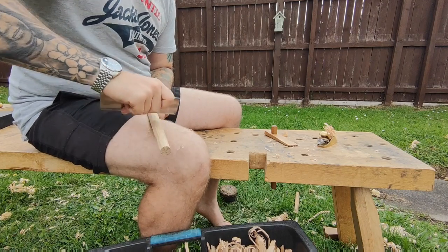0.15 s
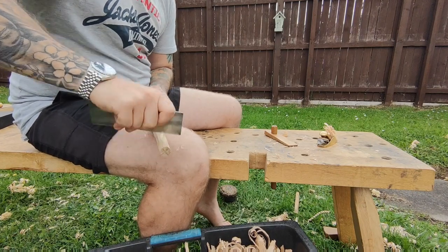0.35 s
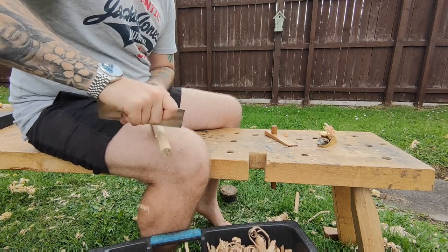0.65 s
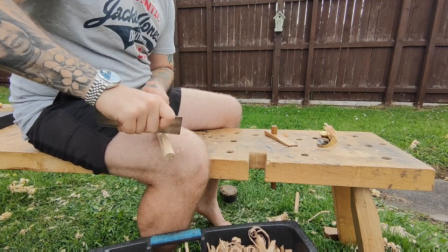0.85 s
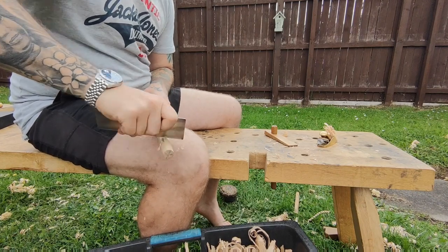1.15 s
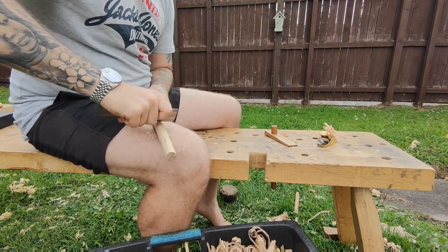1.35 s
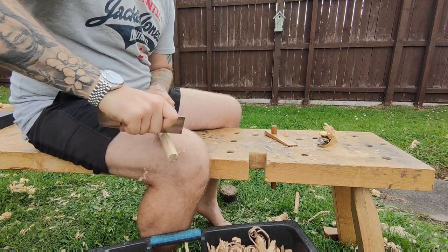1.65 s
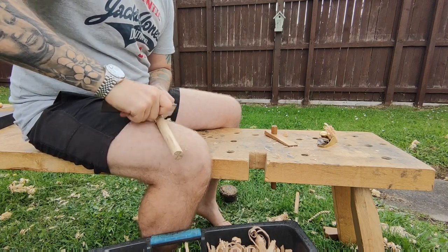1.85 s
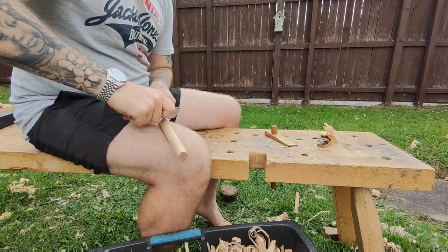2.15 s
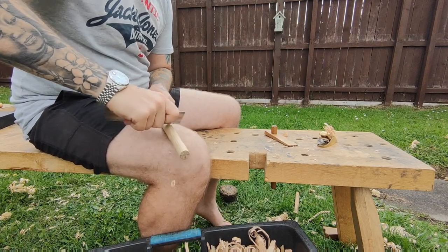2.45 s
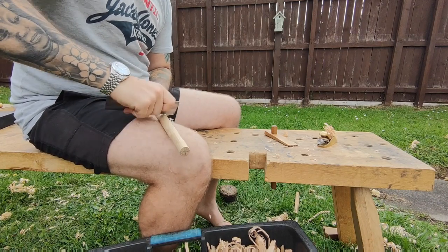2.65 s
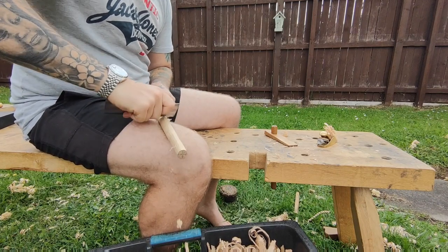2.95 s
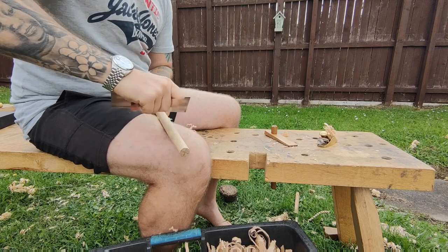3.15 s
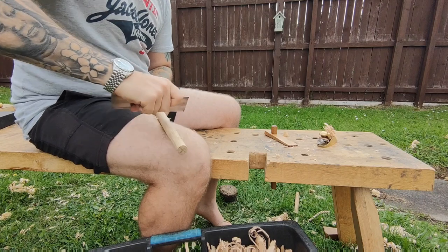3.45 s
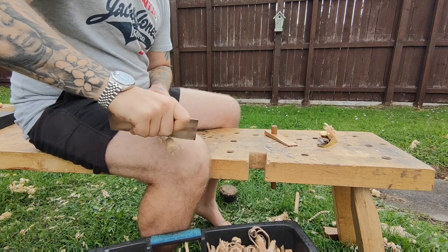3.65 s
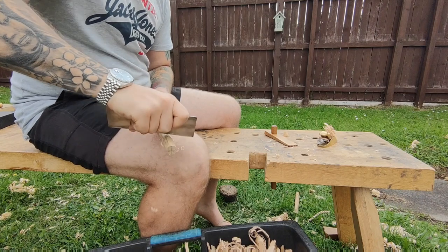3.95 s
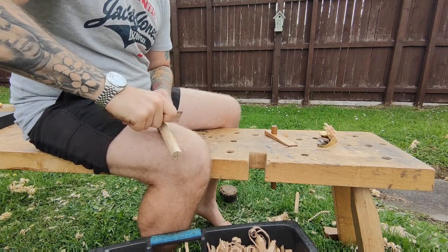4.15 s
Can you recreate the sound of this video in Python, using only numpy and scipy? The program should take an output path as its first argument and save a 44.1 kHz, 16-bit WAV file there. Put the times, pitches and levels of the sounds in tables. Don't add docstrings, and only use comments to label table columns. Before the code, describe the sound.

Regular short scrapes of steel on dry wood, heard close up: tick, then a crackling, slightly metallic shear, then a brief gap, repeated steadily throughout. A few strokes catch and tear harder, notably around 1.4, 2.2 and 3.05 seconds. Knee and bench add a tight reflection, fences a faint short wash. Low breeze and leaves stay quiet behind, with a barely audible insect early on.

```python
import sys
import numpy as np
from scipy import signal
from scipy.fft import rfft, irfft
from scipy.io import wavfile
from scipy.ndimage import uniform_filter1d, map_coordinates

SR = 44100
rng = np.random.default_rng(int(sys.argv[2]) if len(sys.argv) > 2 else 0)


def how_loud(loudness_db):
    steps = np.asarray(loudness_db, float) / 20
    return 10 ** steps


def inscribe(sig):
    pcm = np.round(np.clip(np.atleast_2d(sig).T, -1, 1) * 32767)
    wavfile.write(sys.argv[1], SR, pcm.astype(np.int16))


N = 190511

# [edge bites t/s, edge lifts t/s, force at bite level/dB, midway level/dB, at lift level/dB]
STROKES = [(-0.04, 0.056, -18, -35, -41.5), (0.243, 0.331, -40.5, -40.5, -36.5),
           (0.502, 0.594, -40, -38.5, -35.5), (0.774, 0.868, -44.5, -35.5, -35),
           (1.062, 1.163, -43, -32.5, -33.5), (1.355, 1.444, -36.5, -31, -34),
           (1.611, 1.705, -45, -37, -37.5), (1.877, 1.967, -36.5, -32.5, -38.5),
           (2.151, 2.247, -38.5, -30.5, -35), (2.426, 2.536, -42.5, -31.5, -40),
           (2.704, 2.8, -35, -31.5, -34.5), (2.982, 3.079, -35, -34, -36.5),
           (3.248, 3.348, -39, -35.5, -39.5), (3.534, 3.635, -42, -31.5, -37),
           (3.817, 3.92, -40, -35.5, -36.5), (4.097, 4.206, -35, -35, -38)]
# [peg body level/dB, fine dust level/dB, blade flex level/dB]
GRIP = [(2, -3.5, 2), (3, 3.5, 1), (1.5, -1, 4.5), (-1, -1.5, -1.5), (-1, -0.5, -2), (3.5, -0.5, 3),
        (3, 2, -3.5), (0, -0.5, -1), (1, 0, 0.5), (-1.5, 1, -1.5), (-2.5, -0.5, -1), (3, -3, -0.5),
        (2.5, 2.5, 0), (-1.5, 1, -0.5), (1, 5, 0.5), (0.5, 0.5, -4)]
# [place (0 bite, 1 lift), peg body level/dB, fine dust level/dB, blade flex level/dB]
ALONG = [
    (-0.2, 6.5, -29, 10),
    (0.0, -8, -9, -7.5),
    (0.3, -10, -3, -7.5),
    (0.65, -10, -2.5, -8.5),
    (1.0, -6, -4.5, -5.5),
    (1.4, 9.5, -4, 2),
]
# [t/s, peak level/dB, peg share level/dB, swell t/s]
CATCHES = [(0.321, -17, -15, 0.0053), (0.5117, -32, -6, 0.0054), (0.78, -15, -28, 0.0055),
           (1.051, -21, -5, 0.0035), (1.1394, -21, -26, 0.0066), (1.3817, -9, -11, 0.005),
           (1.3955, -3, -20, 0.0043), (1.678, -17.5, -6, 0.0051), (2.1515, -21.5, -28, 0.0075),
           (2.1644, -29, -34, 0.0043), (2.2074, -20, -39, 0.0049), (2.219, -7, -6, 0.0043),
           (2.4448, -16, -33, 0.011), (2.7107, -46, -35, 0.0055), (2.986, -33, 9, 0.014),
           (3.036, -10, -17, 0.0069), (3.0735, -7.5, -31, 0.0063), (3.1874, -38, -11, 0.0066),
           (3.3444, -46, -18, 0.0045), (3.4544, -43, -13, 0.0073), (3.909, -18, -27, 0.0045),
           (4.119, -15, -39, 0.0093)]
# [f/Hz, level/dB per Hz]
SHEAR = [(350, -16), (1100, -21), (1600, -13), (2100, -3.5), (3000, -1.5), (4600, 0), (6100, -8.5),
         (7600, 0.5), (8300, -21), (8800, -8), (9600, -4), (10500, -1.5), (12700, -14.5), (15200, 2.5)]
# [f/Hz, likeness 0..1]
SHEAR_LIKENESS = [(500, 0.99), (2200, 0.7), (3100, 0.94), (6500, 1), (8500, 0.6), (11000, 0.67),
                  (14000, 0.7)]
# [f/Hz, width f/Hz, level/dB]
BLADE = [(2460, 65, -3), (2993, 220, -11.5), (3390, 86, -13), (4283, 26, -7.5), (5285, 397, -5),
         (5780, 134, -8), (6010, 58, -3), (7390, 680, -11), (12950, 530, -16)]
# [f/Hz, level/dB per Hz]
YARD = [(88, -41), (150, 7), (624, 1), (1320, -3.5), (1640, -10), (2400, -4.5), (6180, -17), (8920, -14.5),
        (15000, -23)]
# [t/s, level/dB, left-right level/dB]
WIND = [(0.0, -50, 0), (0.46, -52, 1), (0.5, -37, 3), (0.58, -51.5, -4), (1.17, -49.5, -8),
        (1.19, -45.5, -13), (1.36, -49, 9), (1.38, -48.5, -9), (2.81, -51.5, 2.5), (2.9, -42.5, -1),
        (2.93, -47, 2), (3.23, -50, 4), (3.96, -51.5, -13.0), (4.02, -52, 0.0), (4.08, -49, -8),
        (4.11, -53, 4), (4.29, -53.5, -10), (4.32, -42.5, -23)]
# [f/Hz, level/dB per Hz]
WIND_COLOUR = [(20, 2.5), (48, 8), (80, 2), (120, -12), (200, -45.5), (320, -75)]
# [t/s, level/dB]
GUSTS = [(0.52, -49), (0.86, -77), (1.2, -54), (1.399, -45.5), (1.66, -51), (2.0, -54.5), (2.4, -70),
         (2.87, -59), (3.07, -56), (3.33, -78), (4.0, -72)]
# [f/Hz, level/dB per Hz]
FLUTTER_COLOUR = [(40, -39), (120, 4.5), (200, -10.5), (350, -19.5), (700, -58), (20000, -90)]
# [t/s, level/dB]
HUM = [
    (.19, -64),
    (.21, -59),
    (.35, -66),
    (.50, -73),
    (.57, -60),
]
# [t/s, peak level/dB, knock share level/dB, bright share level/dB, thud share level/dB]
TAPS = [(0.198, -13.5, -12.5, -14.5, -17), (0.482, -15, -17, -8, -16), (0.727, -17, -4, -14.5, -27),
        (1.02, -15.5, -12, -12.5, -20), (1.308, -19.5, -8.5, -6.5, -20), (1.575, -24.5, -6.5, -12, -15),
        (1.829, -24.5, -8, -14.5, -38), (1.864, -23, -47, 1, -42), (2.11, -23.5, -5, -10.5, -26),
        (2.381, -27.5, -8, -14, -18), (2.413, -26.5, -25, -4.5, -16), (2.663, -28, -1, -9, -35),
        (2.933, -22.5, -9.5, -9, -39), (3.207, -17, -7, -22, -15), (3.489, -14, -13, -12.5, -22),
        (3.794, -13.5, -14.5, -8.5, -16), (4.05, -29.5, -6, -6.5, -9.5)]
# [f/Hz, level/dB, t60 t/s]
PEG = [(339, -19, 0.044), (539, -6, 0.012), (713, -6.5, 0.0052), (795, -5.5, 0.012), (1095, -1, 0.0065),
       (1271, -3.5, 0.011), (1720, -9, 0.0019), (2054, -8, 0.022), (2350, -1.5, 0.0083),
       (2910, -5.5, 0.026), (3740, -4.5, 0.014), (4100, -3, 0.0024), (5110, -6, 0.0042), (6000, -6, 0.0038),
       (7120, -10, 0.0033)]
# [f/Hz, level/dB per Hz]
CRACK_COLOUR = [(1500, -10), (3000, -22.5), (7000, -8), (9000, -11.5), (14000, -8.5), (20000, -3.0)]


def rms_one(x):
    return x / np.sqrt(np.mean(x ** 2) + 1e-20)


def in_time(rows, outside=None):
    s, *columns = np.transpose(rows)
    return [np.interp(np.arange(N) / SR, s, c, outside, outside) for c in columns]


def at_hz(points, hz):
    f, value = np.transpose(points)
    return np.interp(np.log(hz), np.log(f), value)


def drift(rate_hz):
    r = np.exp(-40 * np.pi * rate_hz / SR)
    slow = signal.lfilter([1], [1, -2 * r, r * r], rng.standard_normal(N // 20 + 2002))[2000:]
    return np.interp(np.arange(N) / 20, np.arange(len(slow)), rms_one(slow))


def ring(clicks, hz, t60):
    r, w = how_loud(-60 / (t60 * SR)), 2 * np.pi * hz / SR
    return signal.lfilter([0, np.sin(w)], [1, -2 * r * np.cos(w), r * r], clicks + 1e-18)


def coloured(spectrum, channels=2):
    hz = np.arange(N // 2 + 1) * SR / N + 1
    white = rfft(rng.standard_normal((channels, N)))
    return rms_one(irfft(white * how_loud(at_hz(spectrum, hz)), N))


def clicks_at(times, levels_db):
    out = np.zeros(N)
    places = np.clip((np.asarray(times) * SR).astype(int), 0, N - 1)
    np.add.at(out, places, how_loud(levels_db))
    return out


def strokes(build_db_per_s=1998, die_db_per_s=658, drop_db=10, drop_s=0.018):
    t, force_db, shares_db = np.arange(N) / SR, np.full(N, -140.), np.zeros((3, N))
    place, *usual_db = np.transpose(ALONG)
    for (bite, lift, bite_db, middle_db, lift_db), grip_db in zip(STROKES, GRIP):
        near = slice(max(int((bite - .06) * SR), 0), int((lift + .11) * SR))
        now = t[near]
        along = (now - bite) / (lift - bite)
        arch_db = np.interp(along, [0, .5, 1], [bite_db, middle_db, lift_db])
        build_db = build_db_per_s * np.maximum(bite - now, 0)
        die_db = die_db_per_s * np.maximum(now - lift, 0)
        break_db = drop_db * np.clip((now - lift) / drop_s, 0, 1)
        force_db[near] = arch_db - build_db - die_db - break_db
        shares_db[:, near] = [np.interp(along, place, share) + extra
                              for share, extra in zip(usual_db, grip_db)]
    return force_db, shares_db


def tearing(peak_db):
    t, out = np.arange(2000) / SR, np.zeros(N)
    for (s, _, _, swell_s), top_db in zip(CATCHES, peak_db):
        u = t / swell_s
        out[int((s - .6 * swell_s) * SR):][:len(t)] += how_loud(top_db) * u ** 2 * np.exp(1 - u ** 2)
    return out


def shearing(fibres_per_s=14000., size_db=1.0, chatter_db=1.0, patchy_db=2.0, sing_db=3.5):
    level, (body_db, dust_db, flex_db) = strokes()
    chatter = how_loud(chatter_db * (drift(75) + 1.2 * drift(360)))
    _, catch_db, peg_db, _ = np.transpose(CATCHES)
    tear, tear_body = tearing(catch_db - 22), tearing(catch_db + peg_db - 14)
    sizes = how_loud(size_db * np.minimum(rng.exponential(1, (4, N)), 5)) * rng.choice([-1, 1], (4, N))
    snaps = rng.random((4, N)) < fibres_per_s / SR
    fibres = rms_one(sizes * snaps).reshape(2, 2, N)

    def heard(k, hz, gain_db):
        body, flex, dust = hz < 2750, 2750 <= hz < 3900, np.clip((hz - 8000) / 2500, 0, 1)
        colour_db = body * (body_db + 7) + dust * (dust_db + 3.5) + flex * (flex_db + 9.0)
        force = chatter * how_loud(level + colour_db) + (tear_body if hz < 2900 else tear)
        alike = at_hz(SHEAR_LIKENESS, hz)
        shared, own = fibres[k % 2]
        ports = np.sqrt(1 + alike) * shared + np.sqrt(1 - alike) * own * [[1], [-1]]
        return force * how_loud(gain_db) * ports + 1e-18

    edges, out = 320 * 2 ** np.arange(0, 5.75, .2), np.zeros((2, N))
    for k, (low, high) in enumerate(zip(edges, edges[1:])):
        hz = np.sqrt(low * high)
        band = signal.butter(2, [low, high], "band", fs=SR, output="sos")
        out += signal.sosfilt(band, heard(k, hz, at_hz(SHEAR, hz) + patchy_db * drift(17.4)))
    for k, (hz, width, mode_db) in enumerate(BLADE):
        struck = heard(k, hz, mode_db + sing_db * drift(27.0))
        sung = ring(struck, hz, 1.64 / width) * width * 2 * np.pi / SR
        no_lows = signal.butter(2, hz * 0.56, "high", fs=SR, output="sos")
        out += signal.sosfilt(no_lows, sung) * how_loud(9.0)
    return out * how_loud(5.5)


def off_knee(x, echo_db=-3.5, path_s=0.0007335, sway_s=0.000196):
    sway, n = drift(2.55), np.arange(N)
    left_s = path_s + sway_s * sway
    right_s = 1.089 * path_s + sway_s * (sway + 0.23 * drift(3.7))
    echo = [np.interp(n - np.maximum(lag, 0) * SR, n, v) for lag, v in zip([left_s, right_s], x)]
    return x + how_loud(echo_db) * np.array(echo)


def fences(x, t60_s=0.29, wash_db=-20):
    t = np.arange(int(.5 * SR)) / SR
    onset = np.clip((t - .008) / 0.022, 0, 1)
    response = rng.standard_normal((2, len(t))) * how_loud(-60 * t / t60_s) * onset
    response = signal.lfilter([1], [1, -.15], response)
    response /= np.sqrt(np.sum(response ** 2, axis=1, keepdims=True))
    return how_loud(wash_db) * signal.fftconvolve(x, response, axes=1)[:, :N]


def yard():
    return how_loud(-60) * coloured([(40, -30), *YARD])


def wind(lumpy_db=4.0, gust_s=0.025, calm_edge_db=-62.5):
    level_db, pan_db = in_time(WIND)
    pan_db = pan_db - 0.7
    t = np.arange(N) / SR
    gusts = how_loud(calm_edge_db) + sum(how_loud(top_db) * np.exp(-((t - s) / gust_s) ** 2) for s, top_db in GUSTS)
    lumps = how_loud(lumpy_db * np.array([drift(22), drift(10.2)]))
    rumble = coloured([(4.2, -41), *WIND_COLOUR, (600, -48), (20000, -98)])
    edge = coloured(FLUTTER_COLOUR) * gusts
    rumble = rumble + 0.16 * rumble[::-1]
    return (rumble * how_loud(level_db) + edge) * lumps * how_loud(2.5 + pan_db * [[.5], [-.5]])


def insect(wing_hz=337):
    phase = 2 * np.pi * np.cumsum(wing_hz * (1 + 0.0033 * drift(5.3))) / SR
    return np.sqrt(2) * how_loud(in_time(HUM, outside=-150.)[0]) * np.sin(phase)


def taps(bounce_s=.022, bounce_db=-13.0, contact_cycles=12.7):
    s, peak_db, low_db, bright_db, thud_db = np.transpose(TAPS)
    chance, out = rng.normal(0, 1, (len(s), len(PEG), 3)), np.zeros((2, N))
    for k, (hz, mode_db, t60) in enumerate(PEG):
        share_db = np.clip((hz - 3500) / 800, 0, 1) * (bright_db + 11.5)
        share_db = share_db + (400 < hz < 1500) * (low_db + 8.5) + (hz < 400) * (thud_db + 14.5)
        level_db = peak_db + mode_db + share_db - 5.5
        at = s - .0008 + 0.00036 * chance[:, k, 1]
        clicks = clicks_at(at, level_db + 1.4 * chance[:, k, 0])
        clicks += clicks_at(at + bounce_s, level_db + bounce_db - hz / 400 + 1.5 * chance[:, k, 2])
        contact = min(contact_cycles / hz, .012)
        pushed = ring(clicks, hz, contact) * 2 * np.log(1000) / (contact * SR)
        out += (-1) ** k * ring(pushed, hz, t60) * how_loud(1.1 * rng.normal(0, 1, (2, 1)))
    landing = clicks_at(s - .0005, peak_db + bright_db - 5.5)
    burst = signal.lfilter([1], [1, -how_loud(-60 / (0.016 * SR))], landing)
    burst = uniform_filter1d(burst, size=70)
    return out + burst * coloured(CRACK_COLOUR)


def scene(lag=7.02, sway=0.64, sway_hz=5.7):
    work = (off_knee(shearing()) + off_knee(taps(), echo_db=-12.0)) * how_loud([[.5], [-.6]])
    lagged = np.arange(N) - lag - sway * drift(sway_hz)
    work[1] = map_coordinates(work[1], [lagged], order=3, mode="nearest")
    return work + fences(work) + yard() + wind() + insect()


def band_limit(x):
    return signal.sosfilt(signal.butter(12, 16680, fs=SR, output="sos"), x)


def record(dry, dip_hz=8940, dip_width_hz=320, cutoff_hz=15500):
    dip = signal.lfilter(*signal.iirpeak(dip_hz, dip_hz / dip_width_hz, fs=SR), dry)
    top_cut = signal.ellip(8, .5, 38, cutoff_hz, fs=SR, output="sos")
    mix = signal.sosfilt(top_cut, dry - dip)
    return band_limit(mix)


dry = scene()
out = record(dry)
inscribe(out)
```